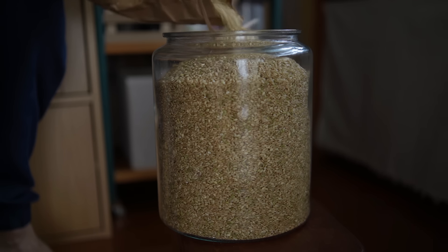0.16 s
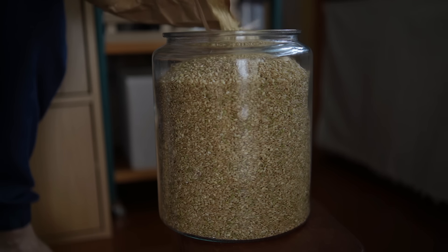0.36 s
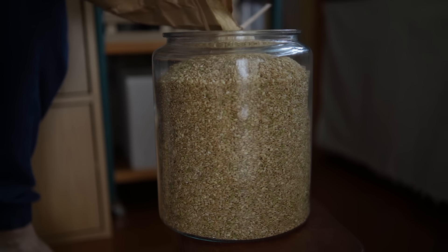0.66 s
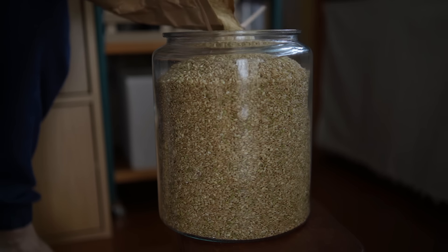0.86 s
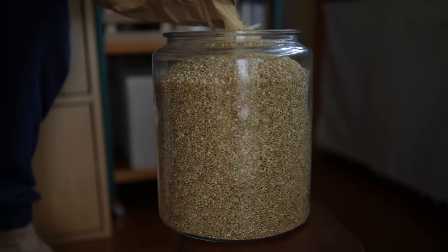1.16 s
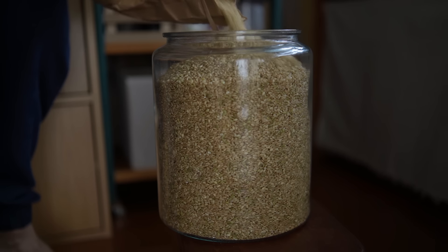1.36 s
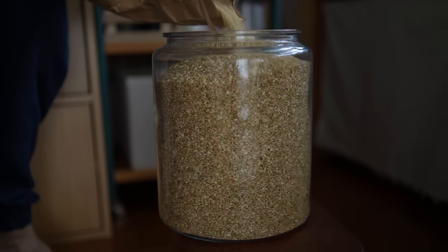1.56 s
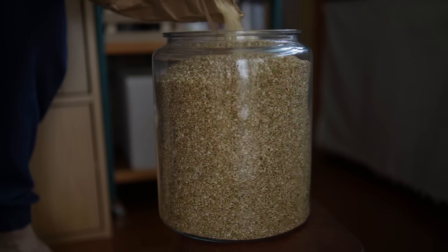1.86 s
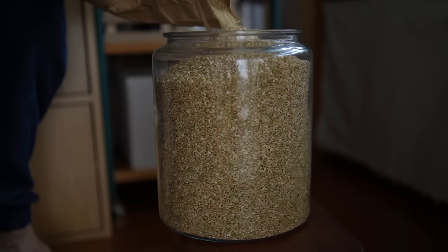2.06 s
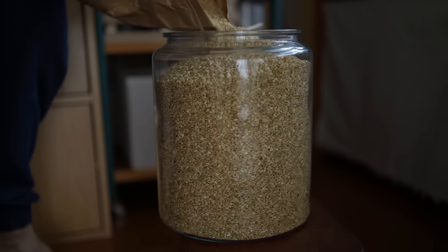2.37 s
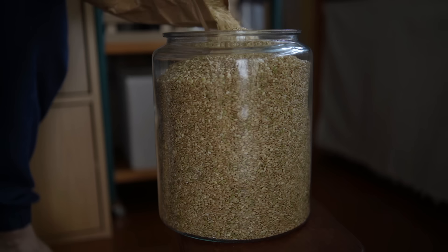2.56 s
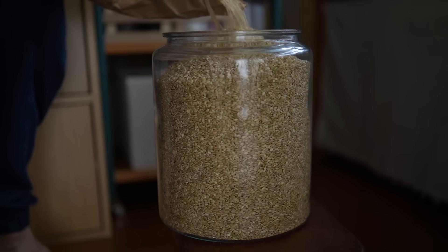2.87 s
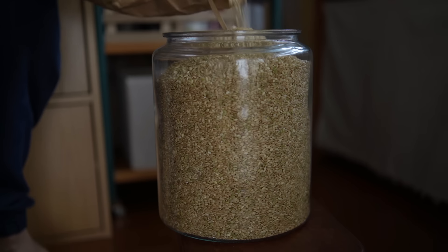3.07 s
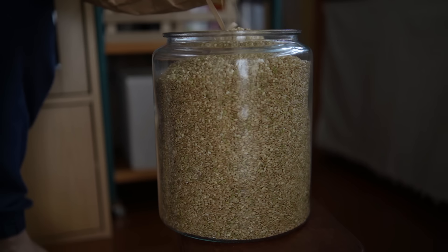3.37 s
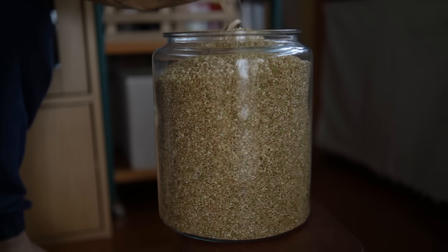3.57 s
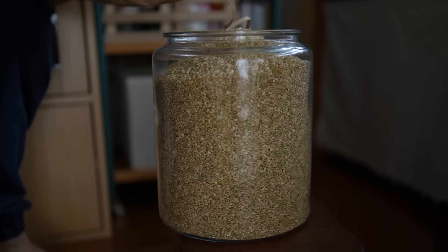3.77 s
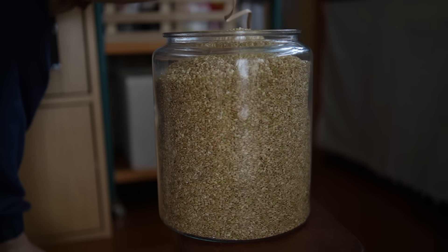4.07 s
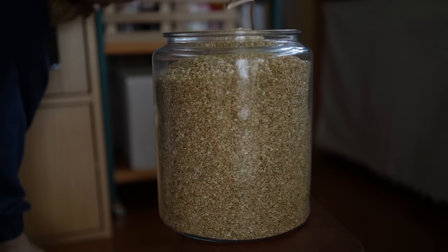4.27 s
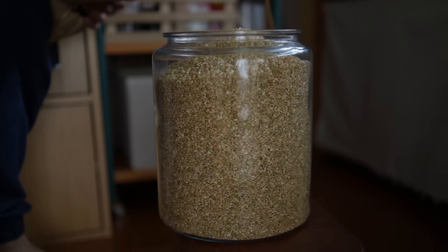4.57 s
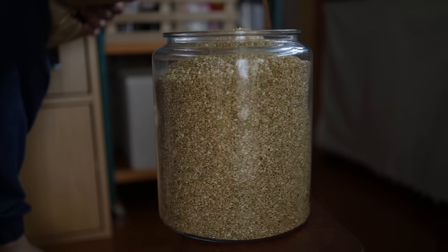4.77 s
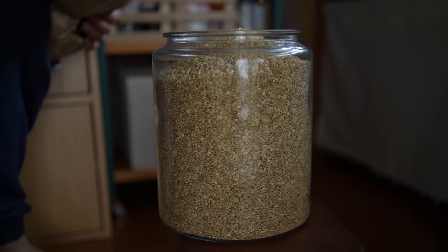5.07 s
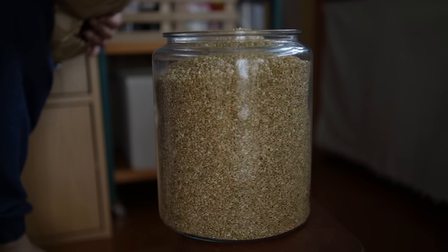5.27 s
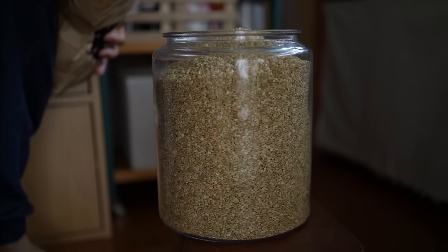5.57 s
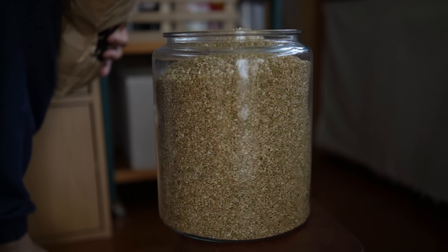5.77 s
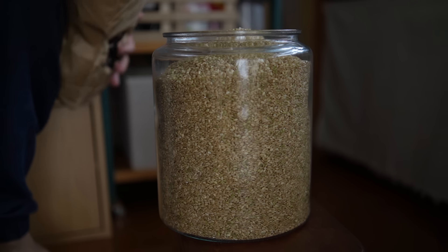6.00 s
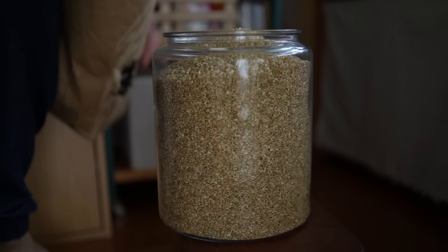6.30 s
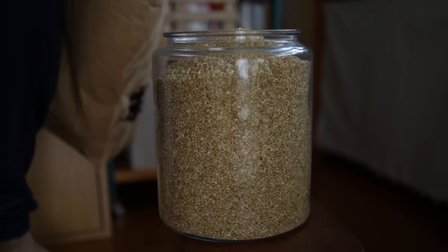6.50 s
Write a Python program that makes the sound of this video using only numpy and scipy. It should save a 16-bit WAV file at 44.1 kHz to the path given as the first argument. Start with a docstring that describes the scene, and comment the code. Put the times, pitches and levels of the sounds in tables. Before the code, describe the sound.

Close by in a quiet room, pouring grain rattles and fades to a trickle before stiff paper rustles, snaps and leftover grain slides back.

```python
"""Dry rice pours in surges from a paper bag onto the heap in a nearly full glass jar: random grain collisions
rattle and the husks sizzle, while clumps thud and stray grains click as short noise bursts.
The stream thins to a trickle. Then the bag is tipped upright: paper rustles, buckles and cracks as filtered
impacts and bursts, the hollow bag drums as sagging tones, and the rice left inside slides back to the bottom.
A small quiet room with a faint rumble, heard in mono from close by."""
import sys
import numpy as np
from scipy import signal
from scipy.fft import rfft, irfft, next_fast_len
from scipy.io import wavfile
from scipy.ndimage import map_coordinates

SR = 44100
rng = np.random.default_rng(int(sys.argv[2]) if len(sys.argv) > 2 else 0)


def unload_audio(sound):
    """Save the sound as a 16-bit wav file, at the path given as the first command line argument."""
    columns = np.transpose(np.atleast_2d(sound))
    # keep every value between -1 and 1, then stretch to whole-number steps
    steps = np.round(np.clip(columns, -1, 1) * 32767)
    wavfile.write(sys.argv[1], SR, steps.astype(np.int16))


N = 292824


def amp(db):
    """Decibels to gain."""
    return 10 ** (np.asarray(db) / 20)


def unit(x):
    """Scaled to rms 1."""
    return x / np.sqrt(np.mean(x ** 2) + 1e-20)


def together(gains):
    """The level of unrelated sounds heard at once: their powers add."""
    return np.sqrt(sum(g ** 2 for g in gains))


def along(points, hz):
    """(Hz, value) points read on a log frequency axis."""
    point_hz, value = np.transpose(points)
    return np.interp(np.log(hz + 1), np.log(point_hz + 1), value)


def curves(table):
    """One value per sample for each column after the time."""
    s, *columns = np.transpose(table)
    return [np.interp(np.arange(N) / SR, s, column) for column in columns]


def swell(s, rise_s, hold_s, fall_s):
    """A gain that rises smoothly to 1 at time s, holds, then decays exponentially."""
    t = np.arange(N) / SR - s
    rising = (np.minimum(t, 0) / rise_s) ** 2
    falling = np.maximum(t - hold_s, 0) / fall_s
    return np.exp(-np.minimum(rising + falling, 20))


def wobble(knots_per_s):
    """A smooth random curve through normally distributed knots."""
    knots = rng.standard_normal(int(N * knots_per_s / SR) + 4)
    return map_coordinates(knots, [np.arange(N) * knots_per_s / SR])


def coloured(x, points):
    """x through a causal minimum-phase filter with the gain of the (Hz, dB) points."""
    m = 2 * next_fast_len(len(x) // 2 + 4096)
    gain = amp(along(points, np.fft.rfftfreq(m, 1 / SR)))
    cepstrum = irfft(np.log(gain), m)
    # folding the cepstrum forward in time makes the filter causal
    cepstrum[1:m // 2] *= 2
    cepstrum[m // 2 + 1:] = 0
    return irfft(rfft(x, m) * np.exp(rfft(cepstrum)), m)[:len(x)]


def impacts(per_s, spread_db):
    """Random tiny impacts of overall rms 1 and scattered sizes; per_s may vary over time."""
    struck = rng.random(N) < per_s / SR
    size = np.clip(rng.standard_normal(N), -2, 2)
    sign = rng.choice([-1, 1], N)
    # dividing by the root of the density keeps the level even as it varies
    return unit(struck * sign * amp(spread_db * size) / np.sqrt(per_s))


def burst(t60_s):
    """A cluster of contacts: noise that dies away."""
    t = np.arange(SR // 4) / SR
    return rng.standard_normal(len(t)) * amp(-60 * t / t60_s)


def add(track, s, db, sound):
    """Lay a sound into a track at time s, the mean of its eight strongest samples at db."""
    strongest = np.mean(np.sort(np.abs(sound))[-8:])
    part = track[round(s * SR):][:len(sound)]
    part += amp(db) * sound[:len(part)] / strongest


# Reverberation of the small room. Each row: frequency in Hz, t60 in seconds.
ROOM_T60 = [(150, 0.18), (400, 0.33), (1000, 0.41), (3000, 0.27), (14000, 0.37)]
TAILS_PER_S = 4


def in_room(x, wet_db):
    """Direct sound plus noise tails, crossfaded as the source moves; divided to keep the power."""
    place = np.arange(N) / SR * TAILS_PER_S
    heard = np.zeros(N + SR)
    for k in range(int(place[-1]) + 2):
        near = np.flatnonzero(np.abs(place - k) < 1)
        hz, t, z = signal.stft(rng.standard_normal(SR // 2), SR, nperseg=256)
        decay = amp(-60 * t / along(ROOM_T60, hz)[:, None])
        tail = signal.istft(z * decay, SR, nperseg=256)[1]
        faded = x[near] * np.cos(np.pi / 2 * (place[near] - k))
        echo = signal.fftconvolve(faded, tail / np.linalg.norm(tail))
        heard[near[0]:][:len(echo)] += echo
    return (x + amp(wet_db) * heard[:N]) / np.hypot(1, amp(wet_db))


# Spectrum of the room's rumble. Each row: frequency in Hz, gain in dB.
QUIET_COLOUR = [(25, -19), (60, -4), (140, -3), (250, -8), (600, -12.5), (2000, -12), (15000, -16)]


def quiet_room():
    """The room's faint rumble: steady coloured noise."""
    return amp(-59.5) * unit(coloured(rng.standard_normal(N), QUIET_COLOUR))


# The stream from the bag's mouth, levels before the trims in rice().
# Each row: time in seconds, rattle of the grains in dB, sizzle of their husks in dB.
POUR = [(0, -41.5, -42.5), (.36, -46.5, -44.5), (.93, -43, -45), (1.06, -39.5, -46), (1.25, -41, -39.5),
        (1.52, -41.5, -39.5), (1.75, -47.5, -45.5), (2.15, -48, -45.5), (2.4, -50.5, -50.5),
        (2.62, -48.5, -49.5), (2.88, -47, -45.5), (3.21, -48, -45.5), (3.29, -55.5, -52), (3.7, -70, -73)]
# Each shake of the bag sends out a surge. Each row: time of peak in seconds, rattle level in dB.
SURGES = [(0.074, -42.5), (0.187, -38.5), (.28, -54), (.415, -43), (.55, -44.5), (.665, -44), (.78, -45.5),
          (.895, -41.5), (1.004, -35), (1.11, -38), (1.275, -42.5), (1.786, -46), (1.929, -51.5),
          (2.24, -53.5), (2.56, -51.5)]
SURGE_RISE_S, SURGE_FALL_S, SURGE_SIZZLE_DB = 0.024, 0.069, 1.5  # sizzle relative to rattle


def pouring():
    """Rattle and sizzle gains of the stream, with a surge at each shake."""
    rattle_db, sizzle_db = curves(POUR)
    surge = together(amp(db) * swell(s, SURGE_RISE_S, 0, SURGE_FALL_S) for s, db in SURGES)
    rattle = together([amp(rattle_db), surge])
    sizzle = together([amp(sizzle_db), amp(SURGE_SIZZLE_DB) * surge])
    return rattle, sizzle


# Spectra of grains on the heap, grains on paper, and husks. Each row: frequency in Hz, gain in dB.
HEAP_COLOUR = [(300, -26.5), (1000, -12.5), (1480, -9.5), (1700, -1), (2150, 0), (2750, -1), (3700, 0),
               (4600, -1.5), (5400, -5), (6000, -9), (7000, -6.5), (10000, -2.5), (15000, -33)]
SLIDING_COLOUR = [(300, -31), (1000, -6.5), (1400, -5), (1700, 0.5), (2150, 0.5), (2750, -4), (3650, 0),
                  (4700, -5), (7000, -8.5), (10000, -6), (15000, -42)]
SIZZLE_COLOUR = [(3000, -59.5), (6000, -4), (9000, 10), (12000, 4), (14000, 3), (16000, -2.5)]
HARD_HITS_PER_S, HARD_HITS_DB = 45, -10.5  # a few grains land much harder than the rest


def rice(on_heap, on_paper, husks):
    """Up to thousands of grain collisions a second; a stronger flow is both louder and denser."""
    collisions_per_s = 3000 * (together([on_heap, on_paper]) * amp(47.0)) ** .8
    flutter_db = .8 * wobble(knots_per_s=60)
    # the hardest collisions tick singly; the countless weak ones merge into hiss
    contacts = impacts(collisions_per_s, spread_db=0.5) + amp(-1) * rng.standard_normal(N)
    contacts += amp(HARD_HITS_DB) * impacts(HARD_HITS_PER_S, spread_db=3)
    # grains land on the heap or run over the paper inside the bag
    rattle = on_heap * unit(coloured(contacts, HEAP_COLOUR))
    rattle += on_paper * unit(coloured(contacts, SLIDING_COLOUR))
    scrapes = contacts + 0.47 * impacts(collisions_per_s, spread_db=15)
    sizzle = husks * unit(coloured(scrapes, SIZZLE_COLOUR))
    return in_room(rattle * amp(flutter_db + 1.41), wet_db=-10) + sizzle * amp(flutter_db + 1.5)


# Spectra of the rustling paper and the bag's walls. Each row: frequency in Hz, gain in dB.
PAPER_COLOUR = [(120, -49), (230, -11.5), (300, -1), (365, -1.5), (430, -1), (520, -2.5), (600, -6),
                (700, -1.5), (800, -3), (930, -5), (1300, -10.5), (2200, -9), (3200, -18.5), (5000, -41)]
WALL_COLOUR = [(35, -46), (60, -16), (85, -6), (105, -4.5), (150, -0.5), (215, -7), (350, -24)]


def bag(flex, sway):
    """Flexing paper gives way in many small slips, which the hollow bag and its walls deepen."""
    rustle = unit(in_room(coloured(impacts(500, spread_db=6.5), PAPER_COLOUR), wet_db=0.5))
    boom = unit(in_room(coloured(impacts(130, spread_db=1.5), WALL_COLOUR), wet_db=-6.5))
    return rustle * flex * amp(1.88) + boom * sway * amp(0.9)


# Clumps of rice drop onto the heap. Each row: start in seconds, level in dB.
CLUMPS = [(.178, -40), (.7003, -25), (.8972, -24.5), (1.0047, -30), (1.0575, -21.5), (1.0764, -26),
          (1.1043, -24)]
# Spectrum of a clump landing. Each row: frequency in Hz, gain in dB.
THUD_COLOUR = [(500, -23), (1400, -12), (2100, 3), (3000, -4), (4500, -18), (12000, -19)]
# Stray grains strike the glass. Each row: start in seconds, level in dB before a shared trim.
TICKS = [(.185, -23), (1.1245, -22), (1.2754, -27), (1.8142, -34.5), (1.921, -30.5), (3.374, -41)]


def spills():
    """Clumps land with a short rush; single grains click on the glass, which the rice damps."""
    clumps, ticks = np.zeros(N), np.zeros(N)
    for s, db in CLUMPS:
        add(clumps, s, db, coloured(burst(t60_s=0.018), THUD_COLOUR))
    for s, db in TICKS:
        add(ticks, s, db + 4.5, coloured(burst(t60_s=0.005), SIZZLE_COLOUR))
    return in_room(clumps, wet_db=1.0) + in_room(ticks, wet_db=6)


# The hands bend the bag, levels before the trims in bag() and crinkles().
# Each row: time of full bend in seconds, hold in seconds, rustle in dB, boom of the walls in dB.
BENDS = [(2.776, 0.098, -64, -65), (3.057, 0.015, -57.5, -83), (3.2, 0.036, -62, -73),
         (3.65, 0.087, -57.5, -70), (3.928, 0.037, -55, -73.5), (4.174, 0.12, -61, -71),
         (4.39, 0.036, -54.5, -63), (4.557, 0.015, -39.5, -49), (4.72, 0.018, -40.5, -50),
         (4.951, 0.028, -37, -48.5), (5.024, 0.032, -35, -45), (5.307, 0.12, -40.5, -58.5),
         (5.461, 0.061, -34.5, -54.5), (5.563, 0.017, -47, -48), (5.843, 0.14, -30.5, -39.5),
         (5.99, 0.048, -27, -40), (6.123, 0.09, -34.5, -42.5), (6.221, 0.011, -29.5, -44),
         (6.476, 0.025, -38.5, -69)]
BEND_RISE_S, RUSTLE_FALL_S, BOOM_FALL_S = 0.015, 0.069, 0.077


def bending():
    """Rustle and boom gains of the bends: a quick start, a short hold, and the paper relaxes."""
    rustle = together(amp(db) * swell(s, BEND_RISE_S, hold, RUSTLE_FALL_S) for s, hold, db, _ in BENDS)
    boom = together(amp(db) * swell(s, BEND_RISE_S, hold, BOOM_FALL_S) for s, hold, _, db in BENDS)
    return rustle, boom


# Spectrum of small paper creases. Each row: frequency in Hz, gain in dB.
CREASE_COLOUR = [(250, -7), (800, -19), (1500, -3), (3000, -1.5), (6000, -7.5), (15000, -16)]


def crinkles(bend):
    """Small creases tick at random, as strongly as the bag is bent."""
    snaps = signal.fftconvolve(impacts(60, spread_db=4), burst(t60_s=0.004))[:N]
    creases = unit(coloured(snaps, CREASE_COLOUR)) * bend * amp(-6.5)
    return in_room(creases, wet_db=-10)


# A panel of the bag buckles. Each row: start in seconds, level in dB before a shared trim,
# centre in Hz, t60 in seconds.
BUCKLES = [(2.757, -22, 1290, .006), (3.051, -35, 1900, .04), (3.186, -29.5, 1210, 0.01),
           (3.219, -27.5, 2100, 0.012), (3.64, -34.5, 830, .043), (4.349, -27.5, 1440, 0.23),
           (4.421, -25, 2420, 0.053), (4.459, -30, 1500, 0.034), (4.545, -30.5, 800, 0.026),
           (4.622, -16, 3070, .091), (4.718, -19.5, 980, 0.046), (4.96, -17.5, 575, .048),
           (5.024, -16.5, 875, 0.06), (5.041, -20, 1500, 0.048), (5.149, -21, 1850, 0.058),
           (5.289, -23.5, 1620, 0.058), (5.352, -9.5, 1110, 0.057), (5.458, -6.5, 650, 0.024),
           (5.536, -14.5, 485, 0.085), (5.655, -17, 980, 0.064), (5.829, -7.5, 1130, 0.029),
           (5.855, -9, 650, 0.084), (5.89, -12.5, 1530, 0.017), (5.953, -12.5, 695, 0.031),
           (6.0, -14.5, 564, 0.071), (6.265, -9.5, 427, 0.055)]
SLIPS_PER_S = 2600  # within a buckle


def buckles():
    """A paper panel snaps through: a sharp push into a damped resonance, lower for larger panels."""
    track = np.zeros(N)
    share = min(SLIPS_PER_S / SR, 1)
    for s, db, hz, t60_s in BUCKLES:
        panel = [(170, -36), (hz * .5, -11), (hz * .78, -1), (hz * 1.15, 0),
                 (hz * 1.7, -5), (hz * 3.2, -9), (15000, -30)]
        snap = burst(t60_s)
        snap *= (rng.random(len(snap)) < share) / np.sqrt(share)
        # the first push leads the crumpling that follows
        snap[0] = 4.5
        add(track, s, db - 2.0, coloured(snap, panel))
    return in_room(track, wet_db=-5.0)


# Rice slides back inside the tilted bag, levels before the trims in rice().
# Each row: time of full speed, rise, hold and fall in seconds, rattle in dB, sizzle in dB.
SLIDES = [(2.931, 0.017, 0.028, 0.031, -49, -56), (3.586, 0.094, 0.23, 0.18, -50.5, -47),
          (4.16, 0.097, 0.27, 0.092, -49.5, -49.5), (4.42, 0.049, 0.11, 0.079, -44, -45.5),
          (4.587, 0.035, 0.062, 0.091, -40, -43), (4.935, 0.091, 0.036, 0.12, -38, -40),
          (5.41, 0.07, 0.18, 0.16, -34, -34), (5.796, .13, 0.017, 0.19, -25.5, -30),
          (6.267, 0.097, 0.15, 0.5, -24, -23.5)]
SIZZLE_FALL_SHARE = 0.46  # the sizzle dies sooner than the rattle
# once the bag is lifted, a few grains keep shifting inside
CREEP_FROM_S, CREEP_RISE_S, CREEP_DB, CREEP_SIZZLE_DB = 3.445, 0.17, -57, -52


def sliding():
    """Rattle and sizzle gains: each slide gathers speed, runs and dies away over a steady creep."""
    creep = swell(CREEP_FROM_S, CREEP_RISE_S, N / SR, 1)
    rattle = [amp(CREEP_DB) * creep]
    sizzle = [amp(CREEP_SIZZLE_DB) * creep]
    for s, rise_s, hold_s, fall_s, rattle_db, sizzle_db in SLIDES:
        rattle.append(amp(rattle_db) * swell(s, rise_s, hold_s, fall_s))
        sizzle.append(amp(sizzle_db) * swell(s, rise_s, hold_s, fall_s * SIZZLE_FALL_SHARE))
    return together(rattle), together(sizzle)


# A crease cracks sharply. Each row: start in seconds, level in dB before a shared trim, t60 in seconds.
CRACKS = [(4.546, -12.5, 0.061), (4.811, -14.5, .055), (4.892, -23, 0.093), (5.332, -21, 0.037),
          (5.375, -8.5, 0.031), (5.42, -10.5, 0.026), (5.456, -14, 0.063), (5.555, -16, 0.04),
          (5.576, -7, 0.004), (6.031, -5, 0.0079), (6.105, -10.5, 0.0069)]


def cracks():
    """Stiff creases let go with a bright spray of clicks."""
    track = np.zeros(N)
    bright = [(200, -23), (1500, -5), (4000, -5), (9000, 1), (15000, -4.5)]
    for s, db, t60_s in CRACKS:
        add(track, s, db - 0.2, coloured(burst(t60_s), bright))
    return in_room(track, wet_db=-1)


# The hollow bag drums as its side gives. Each row: start in seconds, level in dB before a shared trim,
# nominal pitch in Hz.
DRUMS = [(4.599, -28.5, 332), (4.825, -37, 338), (4.965, -30, 340), (5.035, -25.5, 319),
         (5.118, -26.5, 316), (5.464, -29, 330), (5.913, -25, 161), (6.003, -17, 453), (6.029, -27, 315)]


def drums():
    """The air in the bag rings for a few cycles, sagging in pitch as the paper relaxes."""
    track, t = np.zeros(N), np.arange(SR // 4) / SR
    envelope = (1 - np.exp(-t / .004)) * np.exp(-t / .009)
    sag = 0.885 + 0.17 * np.exp(-t / 0.016)  # pitch as a share of nominal
    for s, db, hz in DRUMS:
        phase = 2 * np.pi * np.cumsum(hz * sag) / SR
        add(track, s, db - 3, np.sin(phase) * envelope)
    return in_room(track, wet_db=-3.5)


# moving rice stirs the paper too and, faintly, the walls; relative to its rattle
POUR_RUSTLE_DB, SLIDE_RUSTLE_DB, SLIDE_BOOM_DB = -21, -12.5, -34


def scene():
    """Rice, bag and the room's faint rumble, the same in both channels."""
    pour, pour_sizzle = pouring()
    slide, slide_sizzle = sliding()
    bend, boom = bending()
    grains = rice(pour, slide, together([pour_sizzle, slide_sizzle])) + spills()
    flex = together([bend, amp(POUR_RUSTLE_DB) * pour, amp(SLIDE_RUSTLE_DB) * slide])
    sway = together([boom, amp(SLIDE_BOOM_DB) * slide])
    paper = bag(flex, sway) + crinkles(bend) + buckles() + cracks() + drums()
    mono = grains + paper + quiet_room()
    return np.array([mono, mono])


# Response of the microphone. Each row: frequency in Hz, gain in dB.
MICROPHONE = [(4000, 0.5), (5800, -4), (7200, -14.5), (7950, -19), (8250, -32), (8600, -19.5),
              (10200, -5.5), (11200, -2.5), (12100, -2), (13700, 5.5), (15500, 5)]
TOP_HZ = 15800


def record(dry):
    """The microphone has a deep notch near 8 kHz and a peak above it; nothing passes the band limit."""
    heard = np.array([coloured(channel, MICROPHONE) for channel in dry])
    m = next_fast_len(N + SR // 2)
    passed = np.fft.rfftfreq(m, 1 / SR) < TOP_HZ
    return irfft(rfft(heard, m) * passed, m)[:, :N]


dry = scene()
out = record(dry)
unload_audio(out)
```